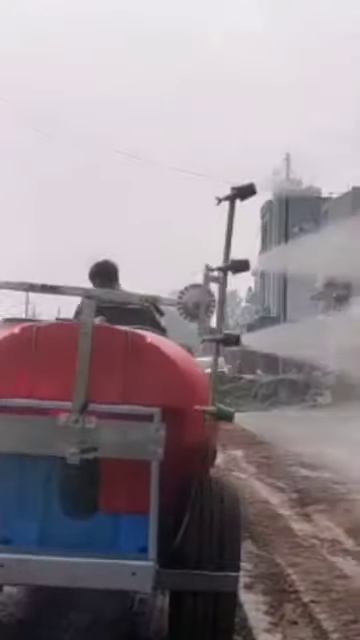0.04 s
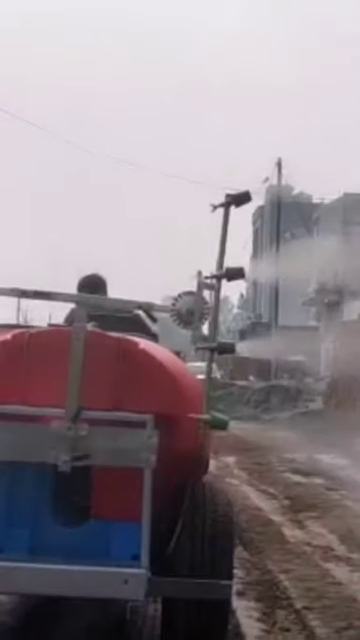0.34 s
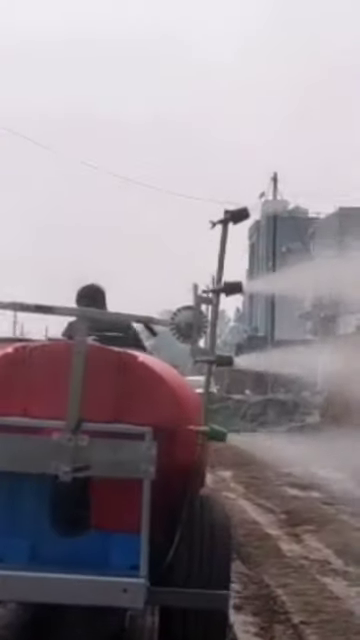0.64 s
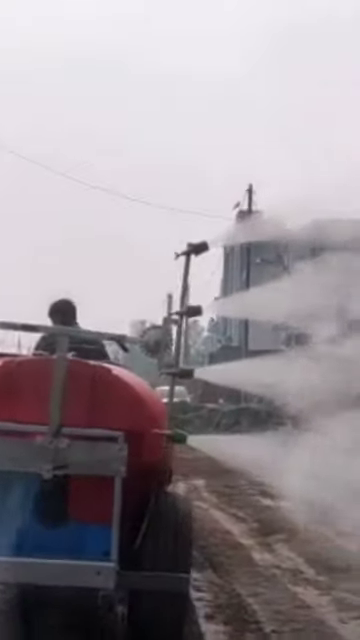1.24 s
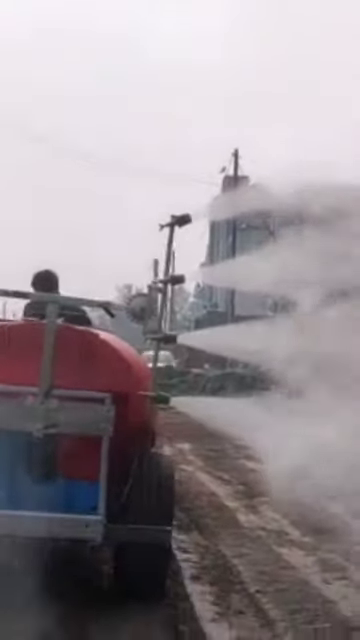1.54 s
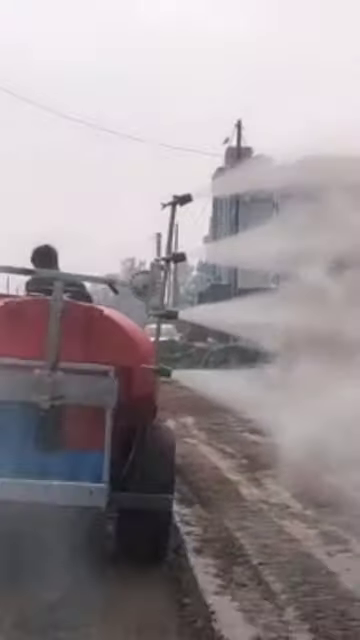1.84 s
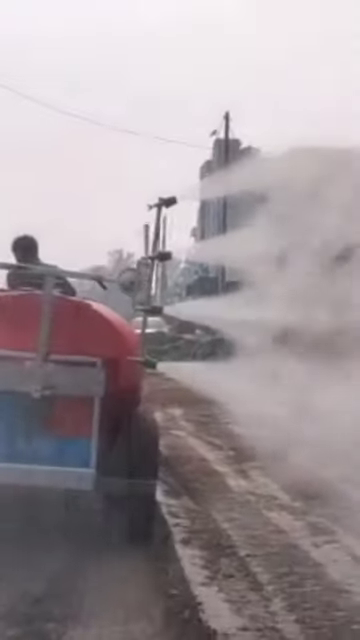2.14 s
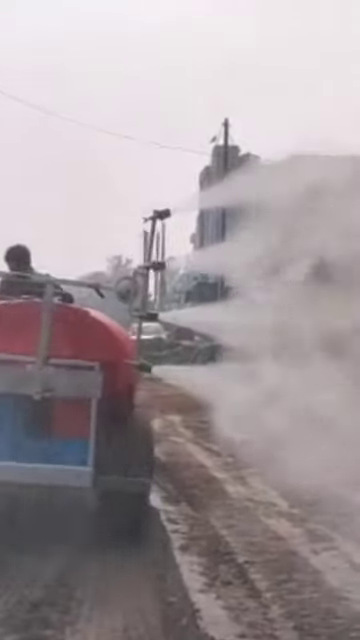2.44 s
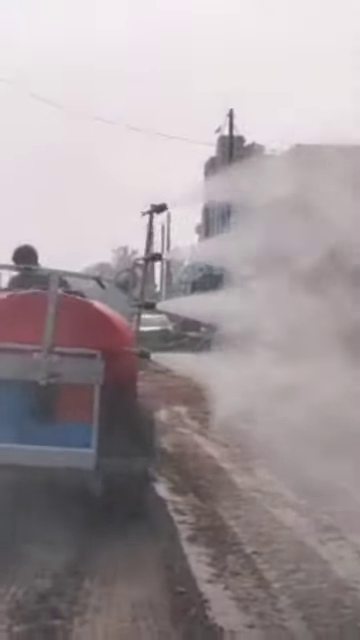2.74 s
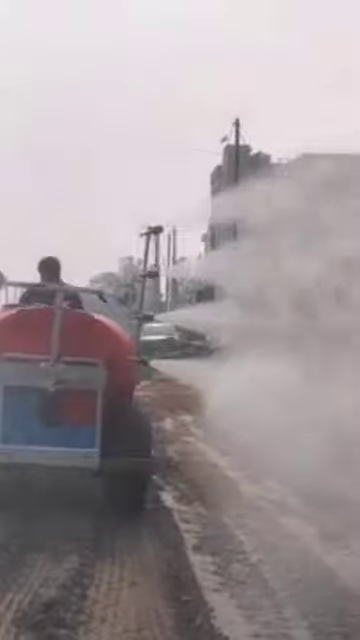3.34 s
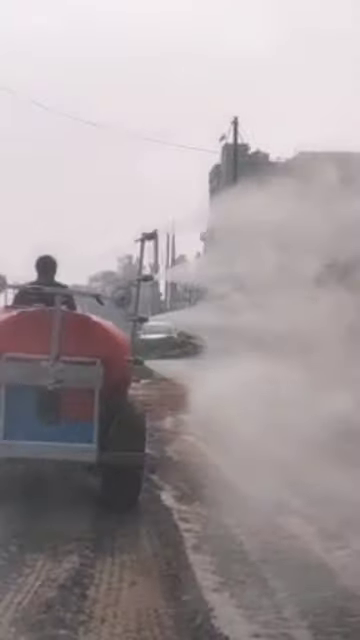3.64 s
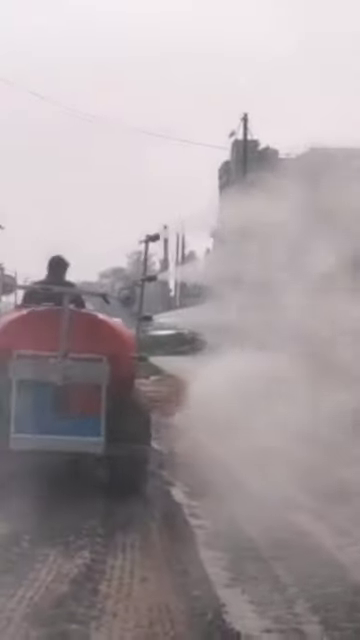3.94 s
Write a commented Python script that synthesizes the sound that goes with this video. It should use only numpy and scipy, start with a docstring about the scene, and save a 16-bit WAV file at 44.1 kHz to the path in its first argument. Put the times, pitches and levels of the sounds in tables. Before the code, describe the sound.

Water spray hissing loudly over a thudding tractor engine outdoors

```python
"""A tractor pulls a water sprayer away along a dirt road, heard from just behind it.
From the start, the exhaust thuds about 42 times a second with a low boom, over a light clatter,
and fans of water hiss from the nozzles. The hiss fades for a moment, then surges back as the
engine growls under load. As the tractor moves off, the hiss holds steady and the boom gives
way to a higher drone."""
import sys
import numpy as np
from scipy import signal
from scipy.fft import rfft, irfft
from scipy.io import wavfile
from scipy.ndimage import uniform_filter1d

SR = 44100
rng = np.random.default_rng(int(sys.argv[2]) if len(sys.argv) > 2 else 0)


def bounce(signal):
    """Save signal as a 16-bit WAV file at the path given by the first command-line argument."""
    frames = np.transpose(np.atleast_2d(signal))
    limited = np.clip(frames, -1, 1)
    pcm = np.round(limited * 32767).astype(np.int16)
    wavfile.write(sys.argv[1], SR, pcm)


N = 176400
TIME_S = np.arange(N) / SR
FREQ_HZ = np.fft.rfftfreq(N, 1 / SR)


def gain(db):
    """Turns decibels into a multiplier."""
    return 10 ** (np.asarray(db) / 20)


def normalise(x):
    """Scales a signal to an average strength (rms) of 1."""
    return x / np.sqrt(np.mean(x ** 2) + 1e-20)


def curve(rows):
    """Joins rows of time_s, value with straight lines."""
    return np.interp(TIME_S, *np.transpose(rows))


def tint(x, rows):
    """Shapes a sound's tone by rows of pitch_hz, level_db."""
    hz, db = np.transpose(rows)
    return irfft(rfft(x) * gain(np.interp(np.log(FREQ_HZ + 1), np.log(hz), db)), N)


def drift(rate_hz):
    """A smooth random wobble, mostly slower than rate_hz."""
    return normalise(irfft(rfft(rng.standard_normal(N)) / (1 + (FREQ_HZ / rate_hz) ** 4), N))


def stereo_noise(likeness, lag_s=0):
    """Noise that is partly alike in both ears and reaches the left one lag_s later."""
    shared, separate = rng.standard_normal((2, N))
    left = irfft(rfft(shared) * np.exp(-2j * np.pi * FREQ_HZ * lag_s), N)
    right = likeness * shared + np.sqrt(1 - likeness ** 2) * separate
    return np.array([left, right])


# How fast the engine fires: time_s, rate_hz
FIRING_RATE = [(0,45.8),(.15,46.4),(.38,47.3),(.55,44),(.78,40.1),(1.05,43),(1.35,42.4),(1.66,42.7),(1.92,40.7),(2.18,43.1),(2.38,42.2),(2.85,43.3),(3.1,42),(3.35,41.5),(3.58,42.7),(4,42.8)]


def count_firings():
    """Counts the engine's firings so far; each whole number is one thud."""
    return np.cumsum(curve(FIRING_RATE)) / SR


# Three controls for the exhaust's tones, each: time_s, control_db
BOOM = [(0,-1.5),(.25,1.5),(.48,0),(.65,4.5),(.83,0.5),(1,5),(1.7,4),(1.85,-3.5),(2.05,2),(2.2,2.5),(2.4,0.5),(2.95,3),(3.2,-12.5),(3.42,-12),(3.55,-5.5),(4,-10.5)]  # the low boom
DRONE = [(0,-15),(.8,-14),(1.1,-13),(1.45,-7),(1.75,-2.5),(2.1,-1),(2.4,2),(2.95,1),(3.45,8.5),(3.58,5),(4,5.5)]  # the higher drone
LOAD = [(0,-8.5),(.45,-9),(.6,-0.5),(.8,6),(1.05,3),(1.3,1.5),(1.7,1),(2.2,-1),(3,-3.5),(4,0.5)]  # how hard the engine works; also drives the growl
# The tones, and how far each follows the controls:
# multiple_of_firing_rate, level_db, boom_db_per_db, drone_db_per_db, load_db_per_db
EXHAUST_TONES = [(1,-55.5,0,-0.29,-0.34),(2,-45.5,-.5,-0.36,-0.45),(3,-36,1.25,-0.17,-0.22),(4,-27.5,1,0.038,0.081),(5,-29.5,0.7,0.41,1.2),(6,-32,-0.05,0.14,0.52),(7,-25.5,0,1,-0.12),(8,-44.5,0.4,-0.34,1.48),(9,-55,-1,-0.39,.8),(10,-56.5,-0.9,0.2,0),(19,-53.5,1,0.91,-0.25)]


def exhaust(firings):
    """One pulse per firing, each a little different, smeared by the pipe into a boom and a drone."""
    controls = np.array([curve(BOOM), curve(DRONE), curve(LOAD)])
    smear_rad, wander_rad, waver_db = 0.55, 0.33, 0.89
    pulses = np.zeros((2, N))
    for multiple, db, *follows in EXHAUST_TONES:
        level = gain(db + np.dot(follows, controls) + waver_db * drift(rate_hz=6.6))
        phase = 2 * np.pi * multiple * firings - smear_rad * (multiple - 5) ** 2
        phase += wander_rad * drift(rate_hz=1.26)  # the path from the pipe changes as the tractor moves
        scattered = 0.12 * drift(rate_hz=2.6) * np.sin(phase)  # sound arriving by roundabout paths
        pulses += level * (np.cos(phase) + np.array([scattered, -scattered]))
    unevenness = 0.083 * rng.standard_normal(256)  # one value per firing
    return pulses * (1 + np.interp(firings, np.arange(len(unevenness)), unevenness))


# Tone of the gas puffs: pitch_hz, level_db
PUFF_TONE = [(20,-21),(45,-18),(72,-7),(105,-4.5),(150,-2),(200,-1),(260,1.5),(330,-4),(420,-15.5),(560,-26),(900,-49)]
# Their loudness: time_s, level_db
PUFF_LEVEL = [(0,-32.5),(.35,-34.5),(.6,-32),(1,-35),(1.7,-35.5),(2.8,-34),(4,-38)]


def puffs(firings):
    """Swirling gas leaves the pipe with every firing."""
    throb = 1 + 0.23 * np.cos(2 * np.pi * firings)
    gas = stereo_noise(likeness=0.93) * throb
    return gain(curve(PUFF_LEVEL)) * normalise(tint(gas, PUFF_TONE))


# Tone of the clatter: pitch_hz, level_db
CLATTER_TONE = [(40,-31),(150,0),(400,2.5),(560,-4.5),(700,1),(1020,-0.5),(1400,-9.5),(2000,-25),(3500,-24),(8000,-43)]
# Its loudness: time_s, level_db
CLATTER_LEVEL = [(0,-40),(.35,-38.5),(.65,-36),(1.3,-37.5),(2.1,-38),(3.1,-39.5),(4,-39)]


def clatter(firings):
    """The engine and pump rattle, throbbing lightly with each firing."""
    throb = 1 + 0.12 * np.cos(2 * np.pi * firings)
    rattle = stereo_noise(likeness=0.66, lag_s=0.00021) * throb
    return gain(curve(CLATTER_LEVEL)) * normalise(tint(rattle, CLATTER_TONE))


# Tone of the spray at each ear: pitch_hz, left_db, right_db
SPRAY_TONE = [(80,-40,-40),(400,-24,-18),(1000,-9.5,-14),(1400,-12,-16.5),(1860,-10.5,-14),(2230,-5,-14.5),(2544,0.5,-8),(2890,-6,-11.5),(3340,-4.3,-7.5),(3780,-9,-12),(4450,-15.5,-16),(5340,-14,-13.5),(6270,-1,-6.5),(6780,-0.5,-7.5),(7670,-6,-12),(8300,-9,-11.7),(9000,-11,-11.5),(10200,-12.5,-15),(11960,-7.5,-14.5),(12800,-14,-25),(14400,-14,-14),(15300,-20.5,-20.5)]
# How its low, middle and high parts swell: time_s, rush_db, hiss_db, fizz_db
# Only the rise and fall around each column's middle value counts.
SPRAY_SWELL = [(0,-34.5,-31,-40.5),(.18,-37,-36.5,-47.5),(.4,-39,-44.5,-50.5),(.48,-37.5,-43,-48.5),(.56,-32.5,-37.5,-43.5),(.65,-33.5,-30,-36),(.77,-37,-33,-37.5),(1.15,-36.5,-35,-38),(1.6,-37.5,-35,-39),(2.2,-37.5,-36,-38.5),(2.55,-40,-36,-40.5),(2.7,-37,-36.5,-39.5),(2.87,-38.5,-33.5,-38.5),(3.07,-37,-34.5,-38),(3.32,-39.5,-32,-40.5),(3.62,-39.5,-34.5,-41),(4,-39.5,-34,-40.5)]
# Where those parts lie: rush_end_hz, hiss_start_hz, hiss_end_hz, fizz_start_hz
SPRAY_BANDS = [3080, 6400, 6940, 9900]


def spray():
    """Jets of water break up into a fluttering hiss and a dense patter of droplets."""
    drops_per_s, size_spread_db, flutter_db, patchy_db = 1800, 2, 0.36, 1.57
    sizes = gain(size_spread_db * np.minimum(rng.exponential(1, (2, N)), 5))
    signs = rng.choice([-1, 1], (2, N))
    hits = rng.random((2, N)) < drops_per_s / SR
    drops = normalise(sizes * signs * hits)
    jets = stereo_noise(likeness=0.095, lag_s=0.000271) * gain(flutter_db * drift(rate_hz=65))
    water = gain(-29) * jets + gain(-39.5) * drops
    tone = np.array(SPRAY_TONE)
    tinted = np.array([tint(water[0], tone[:, [0, 1]]), tint(water[1], tone[:, [0, 2]])])
    # Cut the sound into short slices, so each pitch can swell on its own.
    hz, slice_s, slices = signal.stft(normalise(tinted) * water.std(), SR, nperseg=512)
    time_s, *columns = np.transpose(SPRAY_SWELL)
    levels = [np.interp(slice_s, time_s, db) for db in columns]
    rush, hiss, fizz = [db - np.median(db) for db in levels]
    swell_db = np.array([np.interp(hz, SPRAY_BANDS, row) for row in zip(rush, hiss, hiss, fizz)]).T
    # Random patches, blurred over pitch and then time, make the hiss flicker.
    patches = uniform_filter1d(rng.standard_normal(slices.shape), size=7, axis=1)
    patches = normalise(uniform_filter1d(patches, size=8, axis=2))
    _, sound = signal.istft(slices * gain(swell_db + patchy_db * patches), SR, nperseg=512)
    return sound[:, :N]


# Tone of the growl: pitch_hz, level_db
GROWL_TONE = [(60,-50),(180,-7),(290,1.5),(350,1),(400,-10.5),(480,-18.5),(900,-67)]


def growl():
    """A hoarse edge that comes out when the engine works hard."""
    level_db = -41.5 + 1.42 * curve(LOAD)
    return gain(level_db) * normalise(tint(stereo_noise(likeness=0.93), GROWL_TONE))


def scene():
    """Engine and spray together."""
    firings = count_firings()
    return exhaust(firings) + puffs(firings) + clatter(firings) + spray() + growl()


def record(dry):
    """Cuts away the very highest treble."""
    cutoff_hz = 15300
    low_pass = signal.firwin(511, cutoff_hz, window=("kaiser", 9), fs=SR)
    return signal.oaconvolve(dry, low_pass[None], "same")


dry = scene()
out = record(dry)
bounce(out)
```